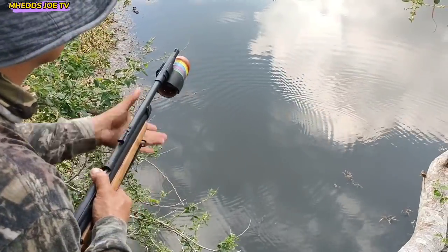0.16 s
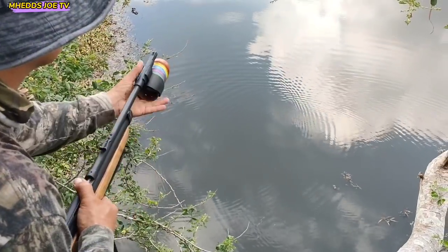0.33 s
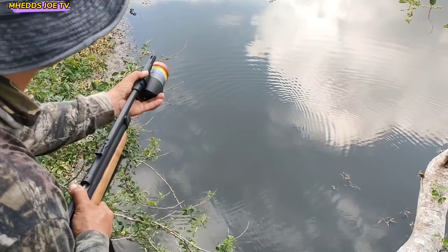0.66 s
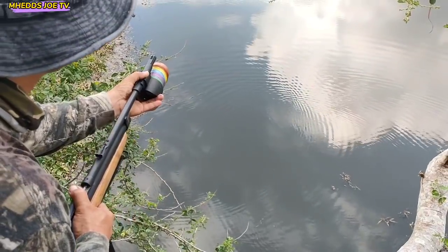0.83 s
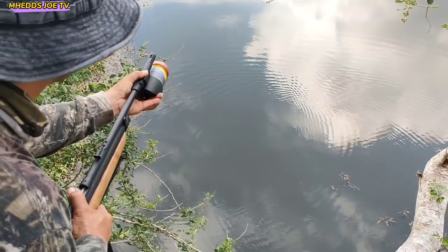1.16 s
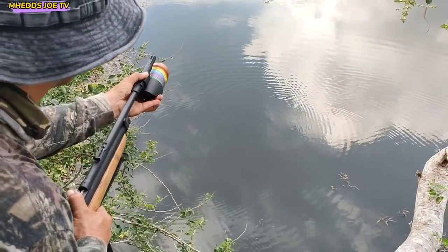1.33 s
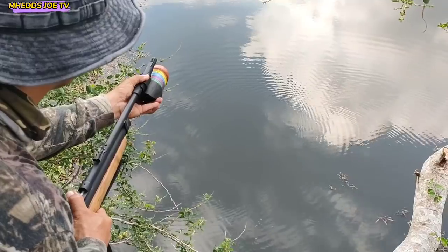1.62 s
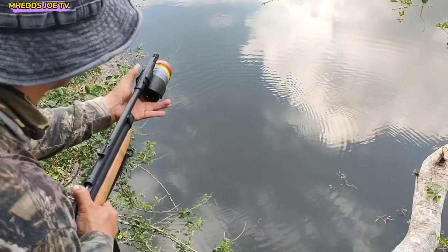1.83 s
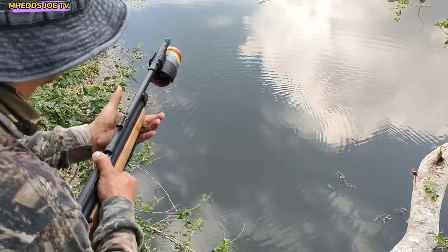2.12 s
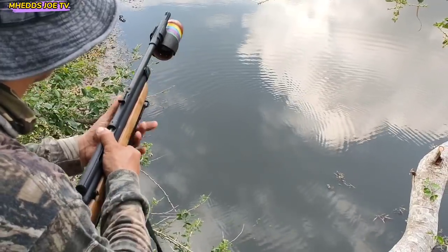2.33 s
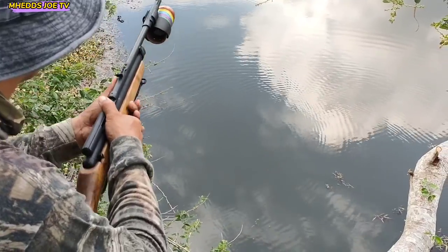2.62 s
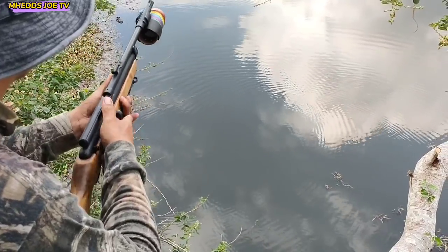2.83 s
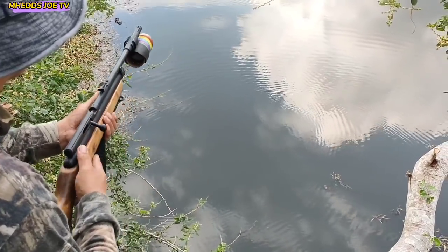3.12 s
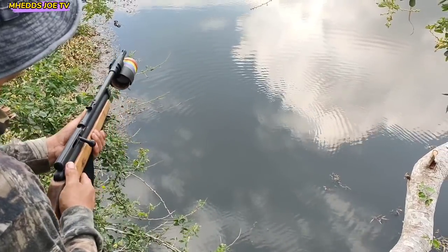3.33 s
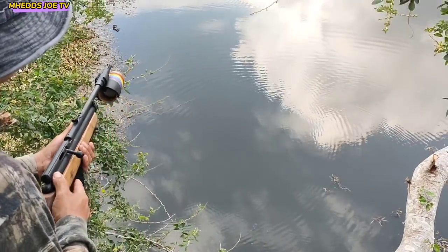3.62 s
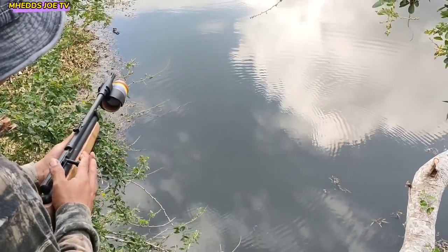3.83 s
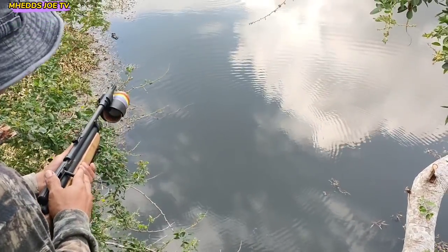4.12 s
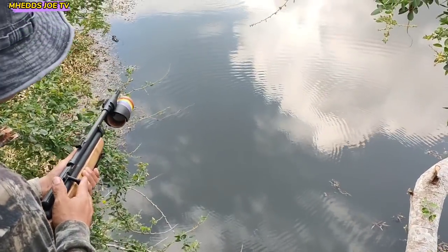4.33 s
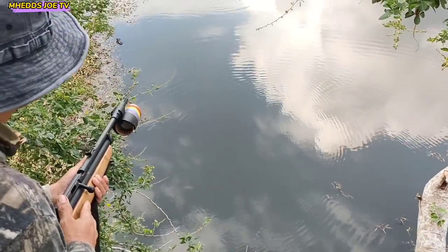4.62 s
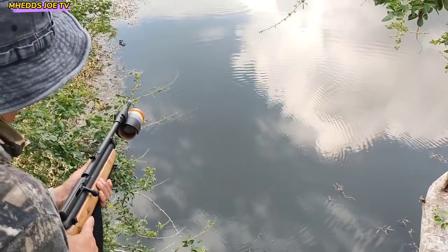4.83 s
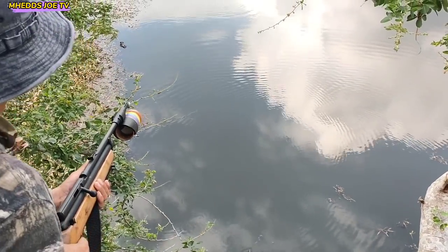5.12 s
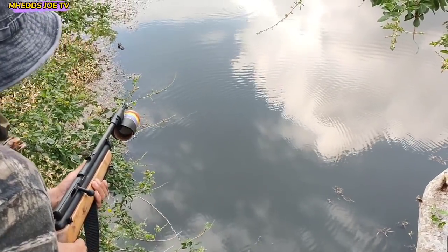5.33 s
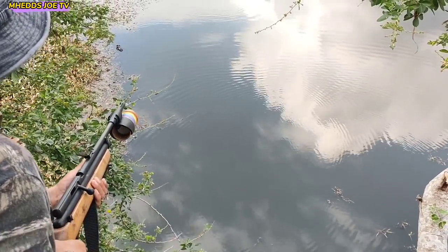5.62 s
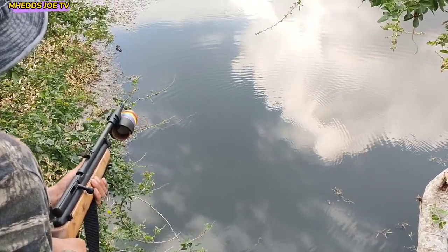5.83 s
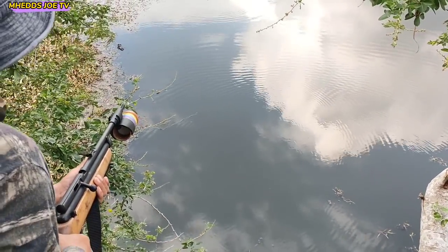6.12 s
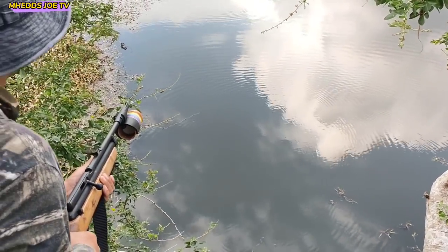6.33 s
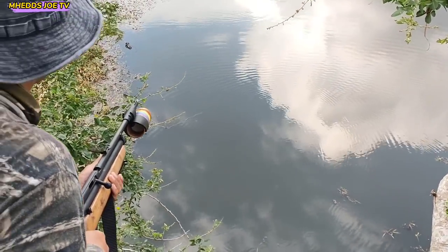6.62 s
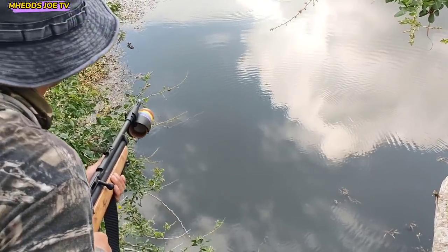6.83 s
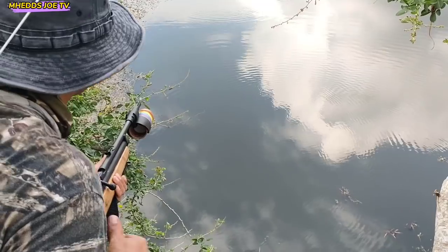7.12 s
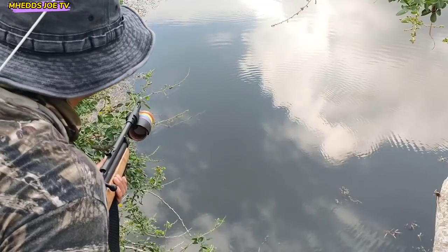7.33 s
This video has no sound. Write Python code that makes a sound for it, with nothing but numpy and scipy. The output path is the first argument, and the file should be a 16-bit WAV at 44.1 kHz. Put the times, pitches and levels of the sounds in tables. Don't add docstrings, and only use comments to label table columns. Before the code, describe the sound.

Outdoors on a pond bank, high cicada trill throbs continuously over soft, surging traffic rumble. Close to the microphone, a reel ticks in a quick metallic cluster after one second; around four seconds a gun bolt clacks with a woody knock. Small taps and faint cloth rustle come between. Distant birds whistle, and a nearer bird on the right chirps twice near the end.

```python
import sys
import numpy as np
from scipy import signal
from scipy.fft import rfft, irfft
from scipy.io import wavfile
from scipy.ndimage import uniform_filter1d

SR = 44100
rng = np.random.default_rng(int(sys.argv[2]) if len(sys.argv) > 2 else 0)


def field_ratio(decibels):
    return 10 ** (np.asarray(decibels, dtype=float) / 20)


def generate_wav(sig):
    pcm = np.round(np.clip(np.atleast_2d(sig).T, -1, 1) * 32767).astype(np.int16)
    wavfile.write(sys.argv[1], SR, pcm)


N = 328986
HZ = np.fft.rfftfreq(N, 1 / SR)
TIME = np.arange(N) / SR


def cicadas():
    song_db, throb_fill, burst_fill = -35, 0.5, 0.75
    singer_pan_db, chorus_db, chorus_pan_db = -6.5, -2.5, -4
    # throbs_per_s, first_throb_s, bursts_per_s
    singers = [
        (8.747, .06, 140.4),
        (7.955, .11, 132.4),
        (8.9, .039, 140.6),
    ]
    singer_db = [-5.5, -7, -9]
    # centre_hz, width_hz, level_db
    tymbal = [(7988, 500, -1.5), (7824, 1350, -2)]
    # centre_hz, width_hz, level_db
    katydid = [(10090, 460, -14), (10570, 510, -16.5)]
    close = 0
    for (rate_hz, first_s, burst_hz), db in zip(singers, singer_db):
        cycle = 2 * np.pi * rate_hz * (TIME - first_s) + 0.3 * walk(4)
        throb = np.clip(throb_fill + np.cos(cycle), 0, None)
        burst = np.exp(-(burst_hz * TIME + 0.08 * walk(3)) % 1 / burst_fill)
        noise = rng.standard_normal((3, N))
        voice = throb * burst * (0.34 * noise[0] + 0.59 * noise[1:])
        close = close + field_ratio(db + 1.26 * walk(3.01)) * unit(voice)
    noise = rng.standard_normal((4, N))
    chorus = field_ratio(chorus_db + 0.49 * walk(4.3)) * sides(chorus_pan_db) * noise[:2]
    song = ring(ports(close, left_lag=-4) * sides(singer_pan_db) + chorus, tymbal, order=3)
    song = song + ring(noise[2:], katydid, order=3) * sides(2.0)
    return field_ratio(song_db) * unit(song)


def handling():
    # start_s, metal_db, wood_minus_metal_db, rattle_ms
    reel = [(0.8939, -15, -27, 1.23), (1.2838, -17.5, -19, 1.35), (1.2895, -29.5, -6.5, 2.4),
            (1.3361, -19, -20, 1.04), (1.3428, -31, -15, .92), (1.3564, -34, -23, 1.5),
            (1.4225, -15.5, -18, 0.81), (1.4271, -28, -20, 1.3), (1.432, -27, -17, 1.2),
            (1.4765, -25, -14, 0.8), (1.4803, -19, -25, 0.62), (1.4852, -19.5, -16, 0.81)]
    # start_s, metal_db, wood_minus_metal_db, rattle_ms
    bolt = [
        (4.052, -23, 2.5, 2.46),
        (4.1104, -19, -9.5, 1.18),
        (4.1276, -20.5, -25, 1.66),
        (4.133, -37, -6, 1.6),
        (4.179, -20, -13, 0.96),
        (4.2144, -38, -13, 1.2),
        (4.2324, -20.5, -16, 0.92),
        (4.2634, -40, -7, 2.4),
    ]
    # start_s, metal_db, wood_minus_metal_db, fizz_minus_metal_db
    taps = [(.5977, -43.5, -5, -21), (0.7108, -34, -18, -26), (.745, -43, -4, -20), (1.2042, -41, -10, -17),
            (2.0591, -33.5, -0.8, -29), (2.194, -45, 0, -17), (2.2288, -41.5, -7, -24),
            (2.977, -44, -22, -11), (3.2205, -33, -5, -23), (3.5854, -54, -12, -9), (3.8394, -45, -4, -17),
            (3.9454, -42, 0, -18), (4.8874, -37, -10, -12), (5.168, -34, -23, -12), (5.7244, -35, -15, -8),
            (6.0654, -36.5, -22, -22), (6.15, -36, -24, -19), (6.729, -40, -15, -21),
            (6.8467, -37, -24, -21)]
    # centre_hz, width_hz, level_db
    metal = [(5760, 440, -4.5), (4400, 1260, -12), (3460, 2160, -14), (6940, 820, -13), (9240, 340, -9.5)]
    # centre_hz, width_hz, level_db
    wood = [(1150, 610, 3.5), (747, 300, -9), (2200, 1100, 2.5), (430, 290, -7.5)]
    # centre_hz, width_hz, level_db
    fizz = [(10500, 3000, 0), (14000, 4000, -4)]
    # centre_hz, width_hz, level_db
    stock = [(640, 400, 0.11), (372, 260, -2.1)]
    reel_fizz_db, bolt_fizz_db, stock_db, tap_ms = -22, -23, -9, 1.42
    reel_pan_db, bolt_pan_db, tap_pan_db = -1, 0.6, -2.5
    clicks = [(s, db, wood_db, reel_fizz_db, ms, reel_pan_db, 0) for s, db, wood_db, ms in reel]
    clicks += [(s, db, wood_db, bolt_fizz_db, ms, bolt_pan_db, field_ratio(stock_db)) for s, db, wood_db, ms in bolt]
    clicks += [(s, db, wood_db, fizz_db, tap_ms, tap_pan_db, 0) for s, db, wood_db, fizz_db in taps]
    t = TIME[:600]
    push = np.zeros((4, 2, N))
    for s, db, wood_db, fizz_db, ms, pan_db, thud in clicks:
        noise = rng.standard_normal((3, len(t)))
        i = int(s * SR)
        rattle = t / ms / 0.00075 * np.exp(1 - t / ms / 0.00063) + 0.3 * np.exp(-t / 0.0077)
        grit = rattle * (noise[0] + 0.51 * noise[1:])
        knock = np.exp(-((t / ms - 0.0006) / 0.00008) ** 2) + 0.16 * grit
        parts = np.array([grit, field_ratio(wood_db) * knock, field_ratio(fizz_db) * grit, thud * knock])
        push[:, :, i:i + len(t)] += field_ratio(db) * sides(pan_db) * parts
    sound = field_ratio(13) * ring(push[0], metal, order=1)
    sound = sound + field_ratio(19.5) * ring(push[1], wood, order=2)
    sound = sound + field_ratio(-17) * ring(push[2], fizz, order=2)
    sound = sound + field_ratio(20.5) * ring(push[3], stock, order=2)
    return scatter(ports(sound, left_lag=-6), 0.08, -13)


def near_bird():
    pan_db_per_khz = -0.96
    phrase = [(0, .021, 2910, 1690, -36.5), (.028, .026, 1260, 2500, -40), (0.057, 0.0298, 2720, 3430, -25),
              (.088, .011, 3600, 3780, -27.5), (0.103, 0.01, 3450, 4220, -24),
              (0.118, 0.0104, 4060, 4850, -27.5), (0.134, 0.0087, 4100, 4900, -23.5),
              (.148, .012, 4400, 5750, -24), (0.163, .014, 5440, 4930, -28), (0.178, .023, 5180, 2480, -22),
              (0.191, 0.035, 2815, 1294, -38)]
    # start_s, pace, pitch_factor, level_db, swell_db
    songs = [
        (6.358, .997, .98, -3, 5),
        (7.052, 1.003, 1.02, 1.5, -2.5),
    ]
    # start_s, length_s, from_hz, to_hz, level_db
    chips = [(6.834, .012, 1870, 4100, -38.5), (6.84, .03, 2500, 3300, -42), (6.845, .03, 4500, 3900, -42),
             (6.843, .012, 3500, 4100, -35), (6.853, .012, 3900, 3300, -36), (6.864, .012, 3300, 4000, -37),
             (6.75, .025, 2050, 2000, -46), (7.053, .016, 5000, 4150, -39), (7.091, .016, 2430, 2300, -31),
             (2.705, .04, 2250, 1750, -50), (3.03, .04, 2250, 1800, -50), (3.37, .04, 2200, 1750, -51)]
    notes = []
    for s, pace, key, song_db, swell_db in songs:
        for at, length, from_hz, to_hz, db in phrase:
            note_db = db + song_db + swell_db * (at / phrase[-1][0] - 0.5)
            notes.append((s + pace * at, length, key * from_hz, key * to_hz, note_db))
    out, waver = np.zeros((2, N)), 0.43 * walk(300)
    for s, length, from_hz, to_hz, db in notes + list(chips):
        span, phase, swell = whistle(s, length, [from_hz, to_hz], 0.59, waver)
        pan_db = pan_db_per_khz * (from_hz + to_hz) / 2000
        out[:, span] += swell * np.sin(phase) * field_ratio(db) * sides(pan_db)
    return scatter(ports(out, left_lag=20), 0.21, -9.5)


def far_birds():
    # start_s, length_s, from_hz, middle_hz, to_hz
    across_pond = [
        (1.19, .1, 3280, 3330, 3350),
        (1.5, .345, 4400, 4170, 4080),
        (1.92, .2, 3560, 3720, 3785),
        (3.27, .28, 4370, 4270, 4270),
    ]
    # start_s, length_s, from_hz, middle_hz, to_hz
    in_trees = [
        (1.12, .3, 515, 525, 520),
        (2.14, .03, 3950, 4150, 4300),
        (2.55, .37, 3900, 3630, 3710),
        (3.0, .3, 4430, 4650, 4340),
        (4.38, .4, 3100, 2780, 3030),
        (4.98, .27, 3420, 3020, 3150),
        (5.83, .26, 3350, 3220, 3320),
    ]
    # start_s, length_s, from_hz, middle_hz, to_hz
    beyond = [
        (.55, .16, 3600, 4900, 6500),
        (.96, .16, 3050, 3050, 3130),
    ]
    distance_db = [-46.5, -50.5, -52]
    # start_s, end_s, trill_hz
    trills = [
        (.55, .72, 45.6),
        (1.49, 1.88, 52),
        (2.503, 2.708, 55),
        (3.0, 3.424, 60),
        (4.303, 5.3, 55),
    ]
    # start_s, length_s, top_hz, level_db
    squeaks = [
        (0.534, 0.029, 2490, -43),
        (0.574, 0.03, 2590, -41),
        (0.611, .03, 2570, -41.5),
        (.649, .028, 2450, -43),
        (.697, .014, 2320, -53),
    ]
    squeak_arch = 0.076
    far, squeak, waver, gate = np.zeros(N), np.zeros(N), 0.85 * walk(90), np.ones(N)
    for start, end, hz in trills:
        trill = 0.25 + 1.35 * np.sin(np.pi * hz * TIME) ** 2
        gate = np.where((TIME > start) & (TIME < end), trill, gate)
    for db, calls in zip(distance_db, (across_pond, in_trees, beyond)):
        for s, length, *glide_hz in calls:
            span, phase, swell = whistle(s, length, glide_hz, 0.1, waver)
            far[span] += field_ratio(db + np.linspace(-6, 2.5, len(swell))) * swell * np.sin(phase)
    for s, length, hz, db in squeaks:
        glide_hz = hz * (1 - squeak_arch * np.array([1, 0, 1]))
        span, phase, swell = whistle(s, length, glide_hz, 0.34, waver)
        squeak[span] += field_ratio(db) * swell * (np.sin(phase) + 0.14 * np.sin(phase / 2))
    both = ports(np.array([gate * far] * 2), left_lag=-10) + squeak * sides(5)
    return scatter(both, 0.25, -9)


def rustle():
    # middle_s, length_s, level_db
    moves = [
        (0, 0.04, -40.5),
        (0.44, 1.14, -51.5),
        (1.405, .12, -53.5),
        (2.35, 0.34, -51.5),
        (3.9, 0.48, -52.5),
        (4.35, 0.52, -52.5),
        (5.6, 1.4, -58.5),
        (7.1, 1, -54.5),
    ]
    # centre_hz, width_hz, level_db
    cloth = [(1530, 4100, -5.5), (3250, 4100, 7.5), (6270, 880, 5.5), (12600, 11000, -1.5)]
    power = sum(field_ratio(2 * db) * np.exp(-(2 * (TIME - s) / length) ** 2) for s, length, db in moves)
    noise = rng.standard_normal((3, N))
    grains = np.sqrt(power) * field_ratio(2.5 * walk(150)) * (0.7 * noise[0] + noise[1:])
    return ring(ports(grains, left_lag=-5), cloth, order=1)


def air():
    # freq_hz, density_db_per_hz
    density = [(22, -23), (38, -5.5), (52, -5), (72, 2), (105, -2), (190, -9.5), (420, -19.5), (800, -28.5),
               (1800, -32.5), (4300, -29.5), (6400, -32), (9500, -33.5), (11500, -36.5), (15400, -37)]
    # freq_hz, side_minus_mid_db
    spread = [(60, -33), (110, -16), (200, -10.5), (380, -6), (700, 1.5), (1290, 1), (2380, -1.5),
              (4400, 0), (8120, 0), (15000, -0.5)]
    # freq_hz, left_minus_right_db
    balance = [(60, 0.0), (110, 1), (200, 1.0), (380, 2), (700, 1), (1290, -0.5), (2380, 0.5), (4400, -1),
               (8120, 7.5), (15000, -2.5)]
    # peak_s, over_lull_db
    surges = [(.2, 9.5), (1.18, 12), (1.49, 3.5), (1.99, 4.5), (2.7, 9), (3.28, 7), (3.57, 3), (3.8, 5.5),
              (4.22, 11.5), (4.68, 5), (5.28, 8), (5.72, 11), (6.65, 4), (7.21, 10)]
    air_db, rise_s, fall_s = -36.5, 0.078, 0.13
    mid, side = rfft(rng.standard_normal((2, N))) * field_ratio(on_log_axis(density))
    side = side * field_ratio(on_log_axis(spread))
    lean = field_ratio(on_log_axis(balance) / 2)
    pair = np.array([(mid + side) * lean, (mid - side) / lean])
    traffic = sum(db * np.exp(-((TIME - s) / np.where(TIME < s, rise_s, fall_s)) ** 2) for s, db in surges)
    traffic = traffic - np.mean(traffic)
    breeze, out = walk(1.75), 0
    for octave in np.arange(4, 14.6, 0.5):
        band = np.cos(np.pi * np.clip(np.log2(HZ + 1) - octave, -0.5, 0.5)) ** 2
        swing_db = 0.58 * traffic if octave < 7.2 else 0.5 * breeze + 2.3 * walk(9)
        out = out + field_ratio(swing_db) * irfft(pair * band, N)
    return field_ratio(air_db) * unit(out)


def whistle(s, length, glide_hz, taper, waver):
    i, n = int(s * SR), int(length * SR)
    bend = np.polyfit(np.linspace(0, 1, len(glide_hz)), glide_hz, len(glide_hz) - 1)
    pitch_hz = np.polyval(bend, np.linspace(0, 1, n))
    phase = 2 * np.pi * np.cumsum(pitch_hz) / SR + waver[i:i + n]
    return slice(i, i + n), phase, signal.windows.tukey(n, min(taper, 1))


def ring(x, modes, order):
    gain = 0
    for f, w, db in modes:
        gain = gain + field_ratio(db) * (1j * HZ * w / (f * f - HZ * HZ + 1j * HZ * w)) ** order
    return irfft(rfft(x) * gain, N)


def scatter(x, t60_s, db):
    t = TIME[:SR // 2]
    decay = np.exp(-np.log(1000) * t / t60_s) * (1 - np.exp(-t / 0.0019))
    tail = rng.standard_normal((2, len(t))) * decay
    tail = tail / np.sqrt(np.sum(tail[0] ** 2))
    return x + field_ratio(db) * signal.fftconvolve(x, tail, axes=1)[:, :N]


def ports(x, left_lag):
    return np.array([np.roll(x[0], int(left_lag)), x[1]])


def sides(pan_db):
    return field_ratio(np.array([[0.5], [-0.5]]) * pan_db)


def walk(rate_hz):
    k = int(SR / rate_hz)
    held = np.repeat(rng.standard_normal(N // k + 1), k)
    return 1.3 * uniform_filter1d(uniform_filter1d(held, k), k)[:N]


def on_log_axis(table):
    hz, value = np.transpose(table)
    return np.interp(np.log(HZ + 1), np.log(hz + 1), value)


def unit(x):
    return x / np.sqrt(np.mean(x ** 2))


def scene():
    return cicadas() + handling() + near_bird() + far_birds() + rustle() + air()


def mute_patches(x):
    # freq_hz, share
    muted_share = [(1200, 0), (3000, .15), (5500, .38), (6450, .65), (7000, .05), (8800, .05), (9300, .55),
                   (9600, .92), (9850, .2), (10700, .25), (11100, .85), (11800, .6), (15400, .45)]
    hz, _, z = signal.stft(x, SR, nperseg=2048)
    power = uniform_filter1d(np.mean(np.abs(z) ** 2, axis=0), size=9, axis=0)
    weak = power < field_ratio(7) * np.median(power, axis=1, keepdims=True)
    chance = uniform_filter1d(rng.standard_normal(power.shape), size=9, axis=0)
    chance = uniform_filter1d(chance, size=2, axis=1)
    rank = chance.argsort(axis=1).argsort(axis=1) / chance.shape[1]
    muted = weak & (rank < np.interp(hz, *np.transpose(muted_share))[:, None])
    return signal.istft(z * ~muted, SR, nperseg=2048)[1][:, :N]


def band_limit(x):
    return signal.sosfilt(signal.butter(12, 16650, fs=SR, output="sos"), x)


def record(dry):
    top_hz, offset = 15480, 0.029
    top_cut = signal.ellip(12, 0.3, 60, top_hz, fs=SR, output="sos")
    return band_limit(signal.sosfilt(top_cut, mute_patches(dry)) + offset)


dry = scene()
out = record(dry)
generate_wav(out)
```